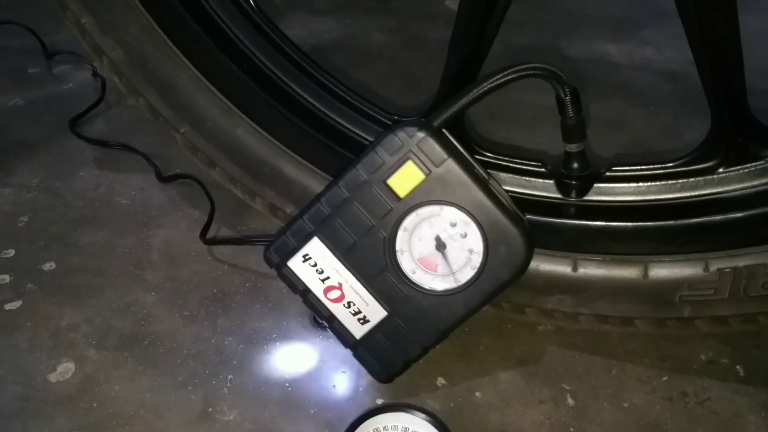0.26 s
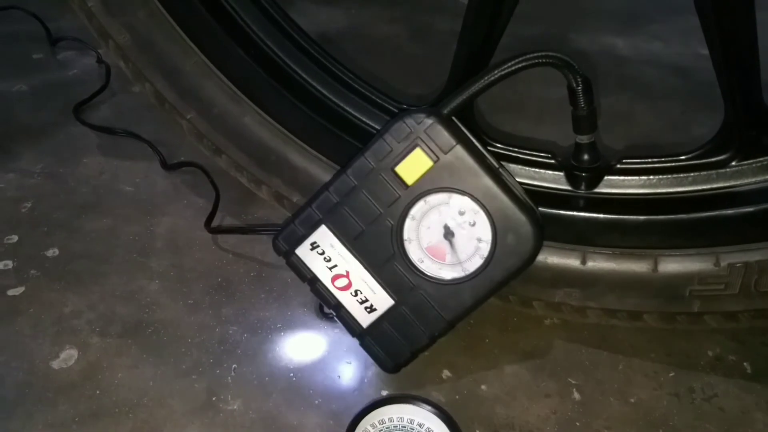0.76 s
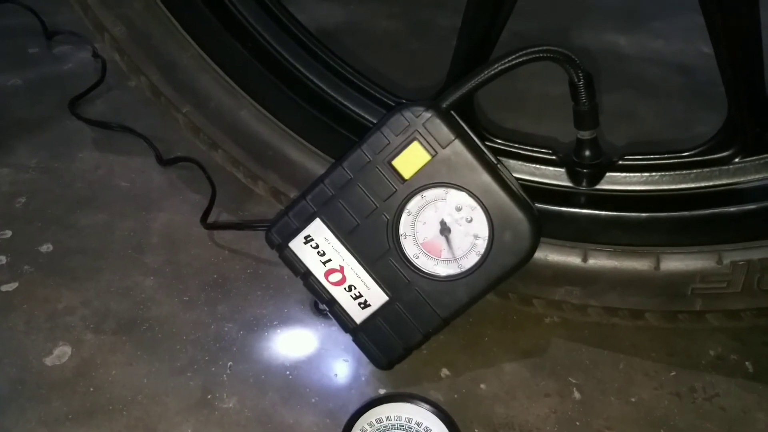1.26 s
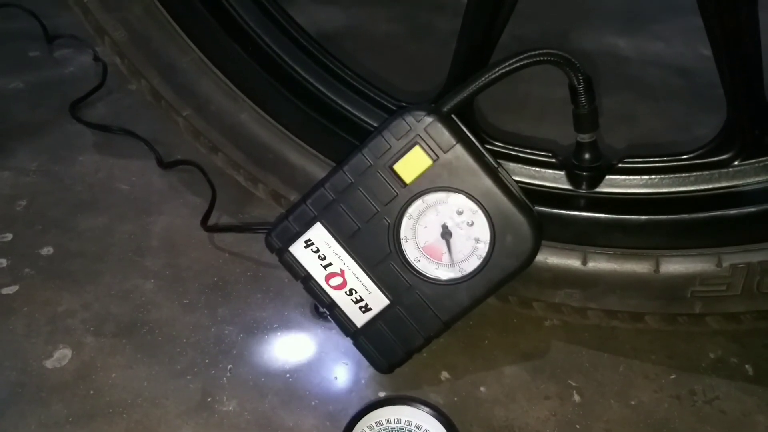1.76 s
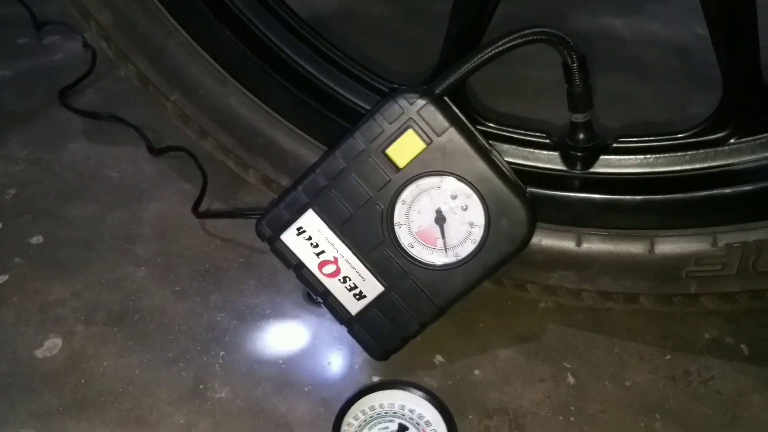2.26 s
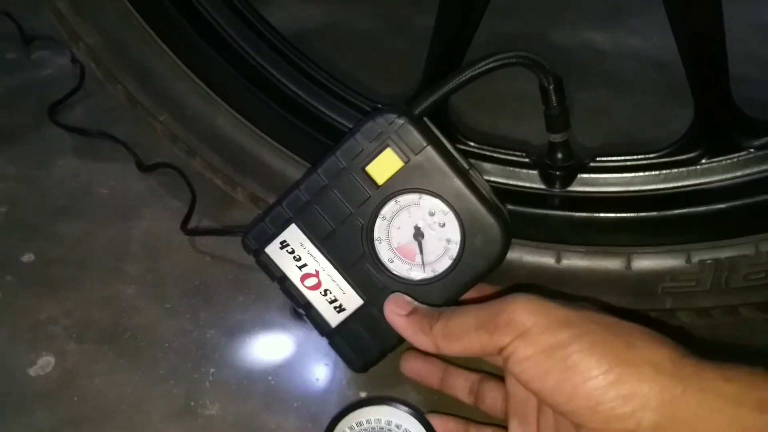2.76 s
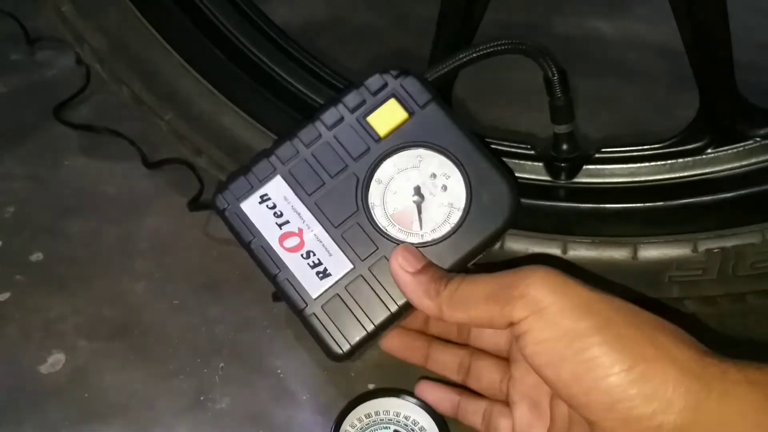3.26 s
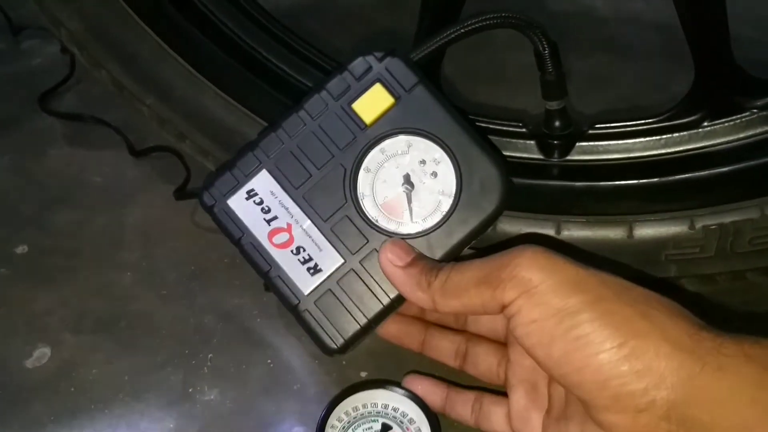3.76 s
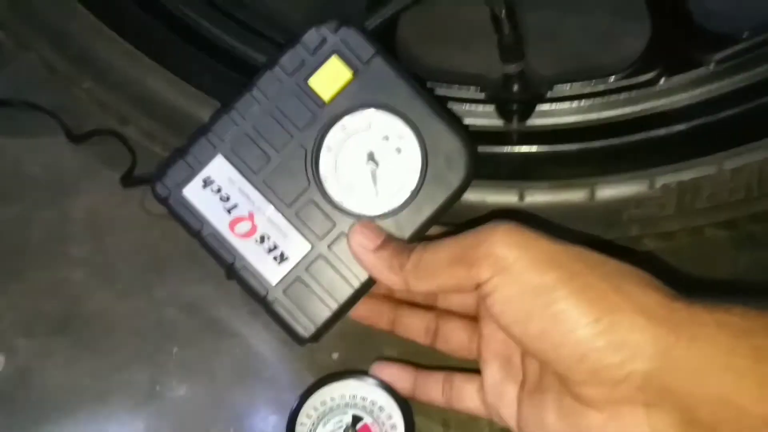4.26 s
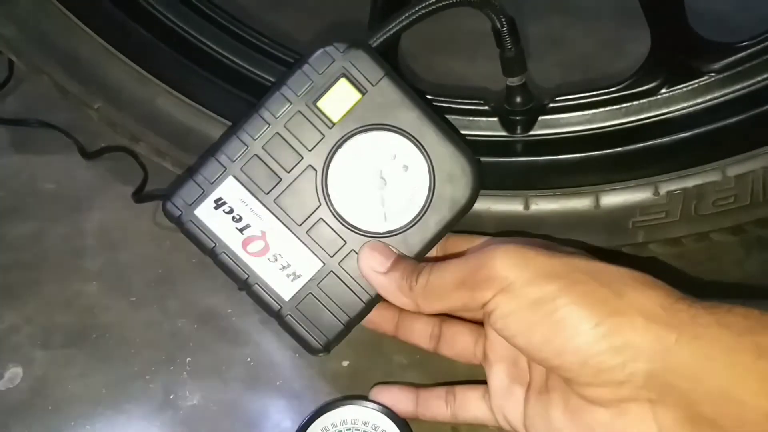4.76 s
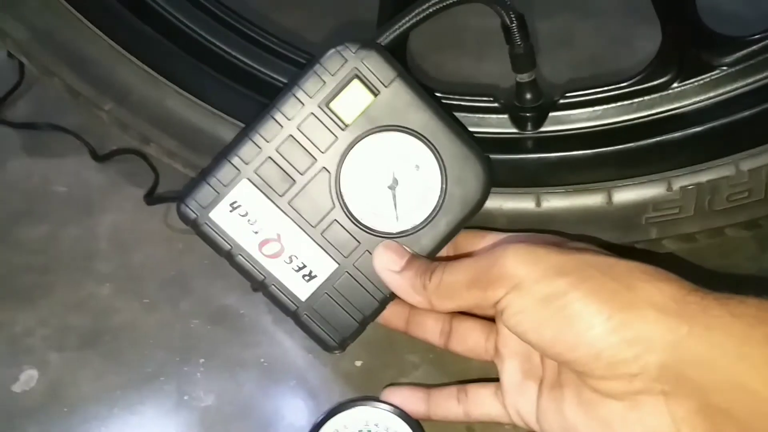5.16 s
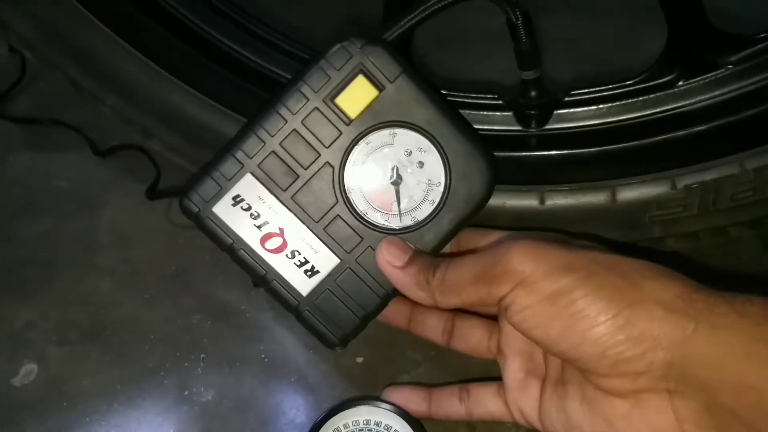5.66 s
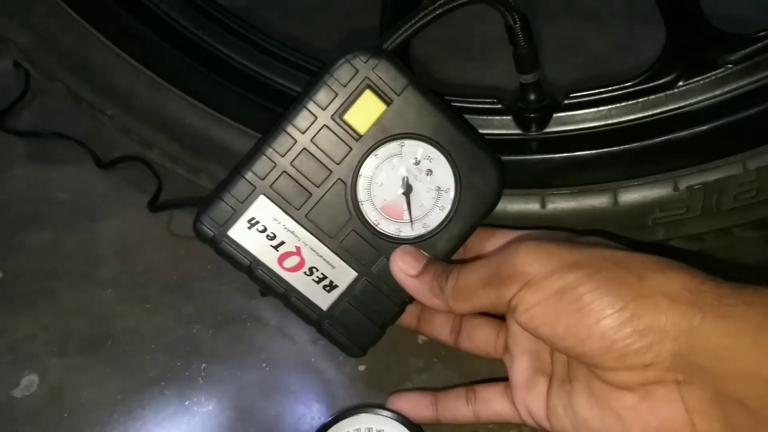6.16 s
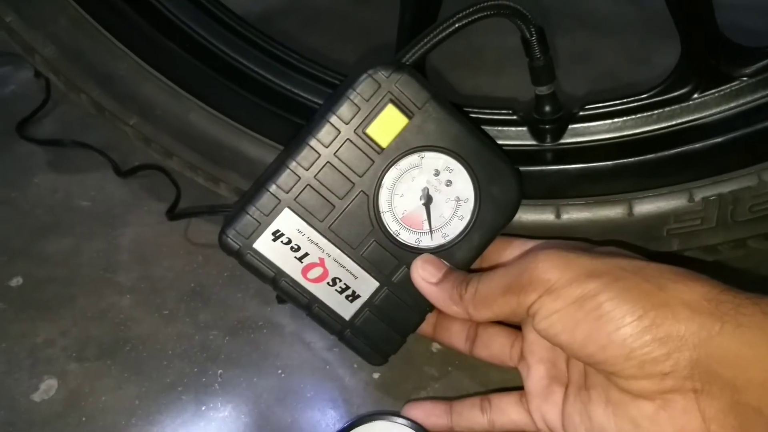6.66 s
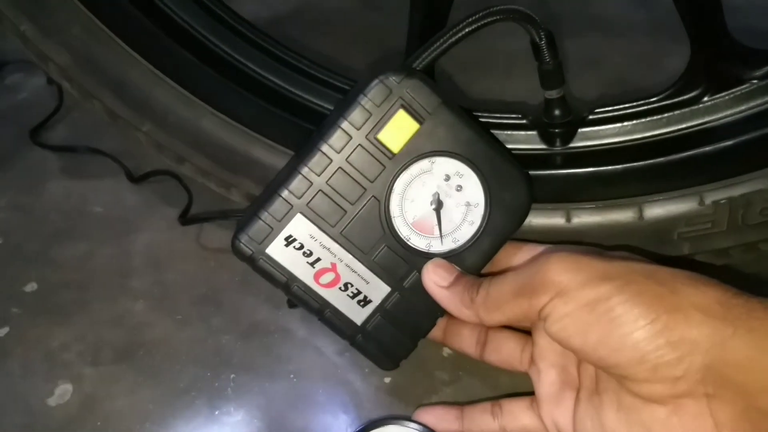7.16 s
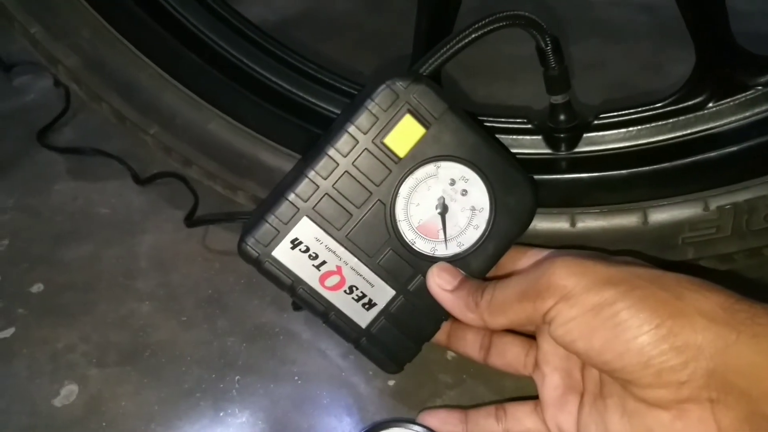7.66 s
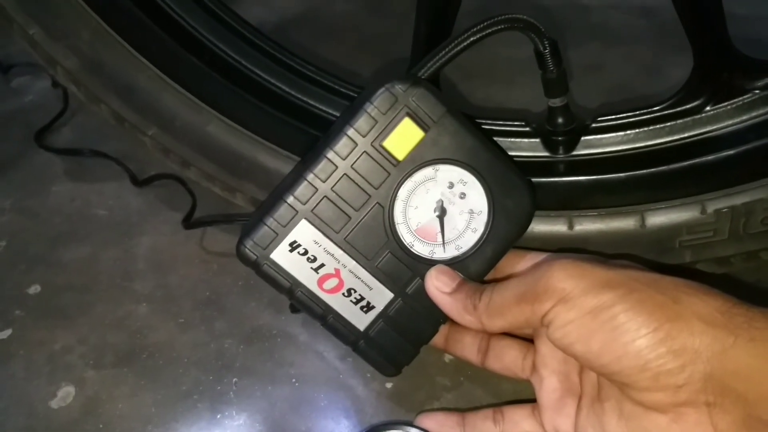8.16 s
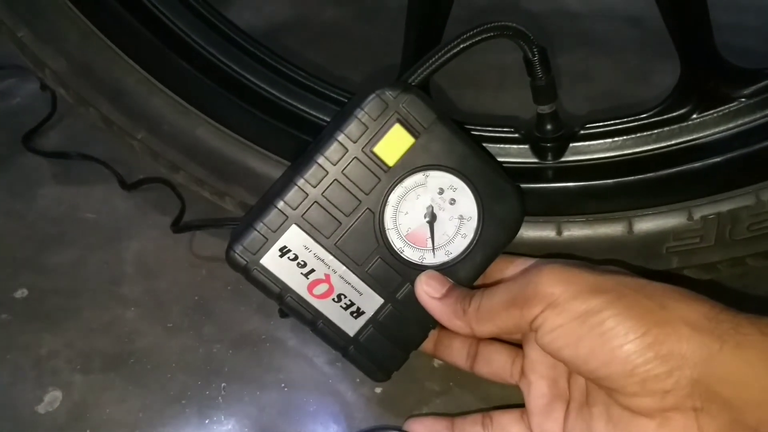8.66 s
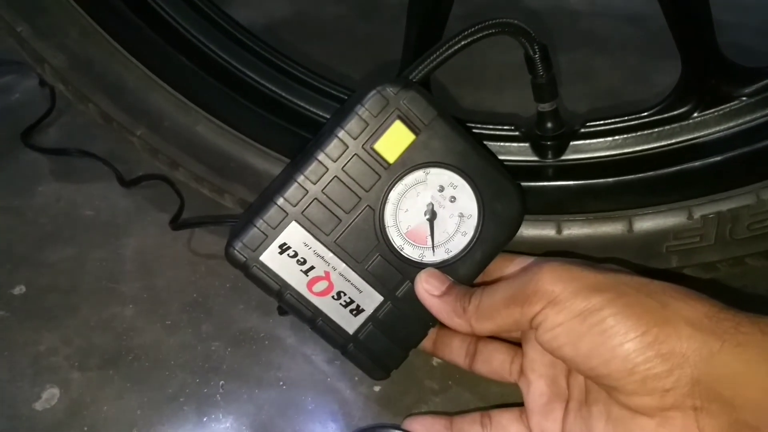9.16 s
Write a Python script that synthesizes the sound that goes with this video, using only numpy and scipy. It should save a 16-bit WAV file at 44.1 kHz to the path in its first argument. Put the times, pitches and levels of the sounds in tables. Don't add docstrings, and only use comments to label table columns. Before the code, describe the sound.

Continuous loud droning chatter from a portable tyre inflator, about sixty knocks a second fused into a coarse buzz. It starts already running and sags very slightly in pitch. A hand touches and picks it up near three seconds with small scuffs and a brief bright ringing, then tilts and steadies it, recolouring the rattle. Close microphone, dry, nearly mono; the motor never stops.

```python
import sys
import numpy as np
from scipy import signal
from scipy.fft import rfft, irfft
from scipy.io import wavfile

SR = 44100
rng = np.random.default_rng(int(sys.argv[2]) if len(sys.argv) > 2 else 0)


def rack_gain(trim_db):
    fader = np.asarray(trim_db, float)
    return 10 ** (fader / 20)


def master(y):
    cut = np.clip(np.atleast_2d(y).T, -1, 1)
    pcm = np.round(cut * 32767)
    wavfile.write(sys.argv[1], SR, pcm.astype(np.int16))


N = 414981

# angle after the knock/turns, repeating contacts level/dB, rattle level/dB
STROKE = [(0, 18, -6.5), (.05, -5, 0), (.14, 10, 3.5), (.25, 2, 0), (.38, -5, -2.5), (.55, -7, -1.5),
          (.72, -6, 1), (.88, -10, 3.5), (.97, -23, -4.5), (1, 2, -2)]
PATTERN_STEPS = 736
FFT_SIZE = 8192


def rms_one(x):
    return x / np.sqrt(np.mean(x ** 2) + 1e-20)


def on_log(points, hz):
    at, db = np.transpose(points)
    return np.interp(np.log(hz), np.log(at), db)


def causal(x, gain):
    half = FFT_SIZE // 2
    cepstrum = irfft(np.log(gain + 1e-9))
    cepstrum[1:half] *= 2
    cepstrum[half + 1:] = 0
    response = irfft(np.exp(rfft(cepstrum)))[:half]
    return signal.fftconvolve(x, response)[:N]


def band(x, hz, width):
    r = np.exp(-np.pi * width / SR)
    poles = [1, -2 * r * np.cos(2 * np.pi * hz / SR), r * r]
    return signal.lfilter([(1 - r * r) / 2, 0, (r * r - 1) / 2], poles, x)


def drift(rate):
    steps = rng.standard_normal(int(N / SR * 200) + 2)
    return np.interp(np.arange(N) / SR * np.clip(rate, .1, 199), np.arange(len(steps)), steps)


def crank():
    # t/s, speed/(turns per minute)
    speed = [(0.0, 3669.8), (1.046, 3647.8), (2.091, 3626.4), (3.137, 3621.7), (4.182, 3606.3),
             (5.228, 3597.4), (6.273, 3584.8), (7.319, 3588.4), (8.364, 3579.1), (9.41, 3595.2)]
    start_turns, wobble_turns, wobbles_per_s = .07, 0.0055, 6
    s, rpm = np.transpose(speed)
    mean = np.cumsum(np.interp(np.arange(N) / SR, s, rpm)) / (60 * SR)
    return start_turns + mean + wobble_turns * drift(wobbles_per_s)


def postures():
    # start t/s, end t/s
    changes = [
        (2.31, 2.38),
        (2.93, 3.17),
        (4.1, 5.1),
        (5.95, 6.35),
    ]
    passed = [np.interp(np.arange(N) / SR, span, [0, 1]) for span in changes]
    return -np.diff([np.ones(N)] + passed + [np.zeros(N)], axis=0)


def knocks(turns, jitter_s, uneven_db):
    chance = rng.standard_normal((int(turns[-1]) + 1, 2))
    at = np.interp(np.arange(len(chance)), turns, np.arange(N)) + jitter_s * SR * chance[:, 0]
    at = np.clip(at, 0, N - 2)
    whole = at.astype(int)
    size = rack_gain(uneven_db * chance[:, 1])
    clicks = np.zeros(N)
    np.add.at(clicks, whole, size * (1 - at + whole))
    np.add.at(clicks, whole + 1, size * (at - whole))
    return clicks


def lagged(x, hz, width):
    r = np.exp(-np.pi * width / SR)
    poles = [1, -2 * r * np.cos(2 * np.pi * hz / SR), r * r]
    return signal.lfilter(poles[::-1], poles, x)


def knock_gain(modes, hz, turn_hz):
    # order/(multiple of crank rate), level/dB
    thud_orders = [(1, -41), (2, -22), (3, -44), (4, -19.5), (5, -28.5), (6, -22.5), (7, -15.5), (8, -16.5)]
    power = rack_gain(2 * -32.5)
    for centre_hz, width, db in modes:
        power = power + rack_gain(2 * db) / (1 + (2 * (hz - centre_hz) / max(width, 30)) ** 2) ** 2
    frame = np.sqrt(power / (1 + (hz / 3800) ** 40))
    order, db = np.transpose(thud_orders)
    thud = rack_gain(np.interp(hz / turn_hz, np.r_[0, order], np.r_[-60, db]))
    return np.where(hz < (order[-1] + .5) * turn_hz, thud, frame)


def contacts(turns, slip_turns):
    pattern = rng.standard_normal(PATTERN_STEPS) * rack_gain(2.0 * rng.exponential(1, PATTERN_STEPS))
    angle = (turns + slip_turns * drift(60)) % 1
    at, db, _ = np.transpose(STROKE)
    rough = np.interp(angle * PATTERN_STEPS, np.arange(PATTERN_STEPS), pattern, period=PATTERN_STEPS)
    return rms_one(rough * rack_gain(np.interp(angle, at, db)))


def rattle(turns, uneven_db, grain_db):
    at, _, db = np.transpose(STROKE)
    gate_db = np.interp(turns % 1, at, db) + uneven_db * drift(45) + 1.0 * drift(180)
    return rms_one(rng.standard_normal(N) * rack_gain(gate_db + grain_db * rng.exponential(1, N)))


def valve(turns):
    centre_turn, length_turns, reed_hz, reed_width_hz = 0.74, 0.17, 5110, 500
    gate = np.exp(-((turns % 1 - centre_turn) / length_turns) ** 2) * rack_gain(0.77 * drift(72))
    angle = (turns + 0.00065 * drift(60)) % 1
    pattern = rng.standard_normal(PATTERN_STEPS)
    flutter = np.interp(angle * PATTERN_STEPS, np.arange(PATTERN_STEPS), pattern)
    hiss = band((flutter + .4 * rng.standard_normal(N)) * gate, reed_hz, reed_width_hz)
    return rms_one(band(hiss, reed_hz, reed_width_hz))


def housing_gain(posture, hz):
    # f/Hz, width/Hz, level/dB
    standing = [
        [(5000, 53, -1), (5400, 61, -9), (6170, 88, -11), (7600, 140, -14), (10100, 60, -26), (11740, 110, -18),
         (12430, 230, -15), (13400, 100, -29)],
        [(5000, 95, -1), (5400, 41, -15), (6630, 320, -27), (7600, 54, -14), (8000, 140, -20), (8400, 110, -15),
         (12100, 600, -21), (14400, 330, -24)],
    ]
    # f/Hz, width/Hz, level/dB
    raised = [
        [(4480, 40, -11), (5220, 780, -5.5), (6100, 38, -28), (6660, 130, -7), (7370, 38, -6.5),
         (7720, 50, -13), (8200, 70, -9.5), (10700, 120, -24), (12060, 100, -8.5)],
        [(3680, 130, -5), (4880, 90, -3.5), (5260, 77, -5.5), (5500, 81, -9), (5800, 140, -5.5),
         (6620, 140, -13), (7300, 100, -11), (7890, 91, -6.5), (9440, 220, -13.5), (12100, 100, -14)],
        [(3990, 100, -11), (4940, 96, -12.5), (5360, 83, -5.5), (5340, 72, -11), (5830, 84, -8.5),
         (6740, 94, -22), (7670, 62, -13), (7970, 78, -12), (10000, 79, -21), (11940, 340, -19.5)],
    ]
    # f/Hz, level/(dB per Hz)
    broad = [
        [(30, -42), (350, -23), (750, -8), (1100, -11), (1700, -4), (2300, -9), (3200, -6)],
        [(30, -42), (350, -23), (750, -8), (1300, -13), (1700, -8), (2400, -11), (3200, -9)],
        [(30, -38), (350, -21), (750, -6), (1300, -13), (1800, -8), (2500, -8), (3200, -1)],
        [(30, -40), (350, -23), (780, -7), (1450, -14), (1800, -9), (2200, -11), (3200, -6)],
        [(30, -40), (350, -23), (780, -7), (1450, -14), (1800, -9), (2200, -12), (3200, -9)],
    ]
    # f/Hz, level/(dB per Hz)
    upper = [
        [(4400, -11.5), (6000, -13), (7000, -16), (8300, -17.5), (10400, -33.5), (13300, -29), (15300, -28)],
        [(4400, -12.5), (6000, -14), (7000, -18.5), (8300, -20.5), (10400, -28), (13300, -26), (15300, -27)],
        [(4400, -14), (5600, -10.5), (6900, -23.5), (9000, -16.5), (10400, -27), (13300, -24), (15300, -24)],
        [(4400, -14.5), (5600, -12.5), (6900, -16.5), (9300, -21), (10600, -26), (13300, -26), (15300, -25.5)],
        [(4400, -14.5), (5600, -7), (6900, -18.5), (8500, -19), (10600, -28), (13300, -27.5), (15300, -27)],
    ]
    power = rack_gain(2 * on_log(broad[posture] + upper[posture], hz))
    for centre_hz, width, db in (standing + raised)[posture]:
        damped_hz = 1.4 * max(width, 130)
        power = power + rack_gain(2 * db) / (1 + (2 * (hz - centre_hz) / damped_hz) ** 2) ** 2
    return np.sqrt(power)


def pump():
    # f/Hz, width/Hz
    lags = [(330, 336), (1700, 690), (3150, 420)]
    # knock, its crack, repeating contacts, rattle, valve hiss, each level/dB
    mix = [
        (4.5, -17, -8.5, 1, -21),
        (4.5, -14, -9.5, -2, -20),
        (4.5, -16.5, -12, -1, -20.5),
        (5, -12.5, -10, -2.5, -14.5),
        (5, -11, -9, -3.5, -15),
    ]
    # knock level/dB, rattle level/dB
    loudness = [
        (-46.5, -45),
        (-48.5, -45),
        (-46.5, -43.5),
        (-48.5, -44),
        (-47.5, -43),
    ]
    early_s = [0, .0004, .0005, .0006, .0007]
    # t/s, level/dB
    near = [(0, -0.5), (.03, -0.5), (2.2, 0), (2.4, -1), (2.9, -0.5), (3.05, -0.5), (3.35, 0), (4, -0.36),
            (4.75, 0.65), (5.9, 0.15), (9.41, 0)]
    # f/Hz, width/Hz, level/dB
    on_floor = [(650, 50, 1), (668, 560, -7), (797, 68, -0.6), (1088, 137, -5.5), (1260, 84, -6.5),
                (1408, 84, -0.6), (1701.0, 353, -2.2), (2530, 35, -7), (2650, 39, -42), (2794, 39, -7.5),
                (3040, 45.0, -8), (3420, 300, -15), (3490, 45.0, -7)]
    # f/Hz, width/Hz, level/dB
    gripped = [(584.0, 140, -6), (655, 67, 2), (805, 57, 4), (1060, 240, -8), (1280, 45.0, -6),
               (1380, 45.0, -5.5), (1490, 53.0, -18), (1720, 160, -3.5), (1900, 99, -5.5),
               (2231.0, 184.0, -15), (2510.0, 65, -6.5), (2780.0, 46, -10.5), (3330, 134, -7.5)]
    # f/Hz, width/Hz, level/dB
    lifted = [(571.7, 63, -2.6), (653.7, 61, 3.3), (805, 58, 6), (1030, 128, -6), (1280, 29, -3.5),
              (1560, 38, -6), (1930, 240, -5.5), (2470, 230, -11), (2615, 43, -6), (3210, 24, -1),
              (3150, 330, -3), (3489.0, 46.0, -22), (3600, 82, -6)]
    # f/Hz, width/Hz, level/dB
    tilted = [(636, 230, -3), (655, 76, -1), (806, 71, 6), (1024, 41, -1), (1285, 200, -10),
              (1707, 49, -0.5), (1885, 150, -6), (2040, 45.0, -9), (2354, 69, -6.5), (2450, 48, -6.5),
              (2660, 110, -7), (3170, 130, -4.5), (3840, 340, -29)]
    # f/Hz, width/Hz, level/dB
    held = [(649, 166.0, 1.7), (808, 70, 6.5), (1014.4, 53, 0), (1223, 290, -9.5), (1640, 40, 4),
            (1758, 110, -3), (1904, 136, -5.5), (2310, 77, -4), (2513.0, 110, -8.5), (2656, 51, 0.5),
            (2920, 220, -10.5), (3263, 55, -2), (3570, 50, -8)]
    turns = crank()
    clicks = -knocks(turns, jitter_s=1.2e-5, uneven_db=-0.32)
    for lag_hz, width in lags:
        clicks = lagged(clicks + 1e-18, lag_hz, width)
    cracks = knocks(turns - .015, jitter_s=1.2e-5, uneven_db=1.0)
    repeating = contacts(turns, slip_turns=0.0006)
    loose = rattle(turns, uneven_db=0.1, grain_db=0.9)
    hiss = valve(turns)
    hz = np.maximum(np.arange(FFT_SIZE // 2 + 1) * SR / FFT_SIZE, 1)
    above_knock = 1 / np.sqrt(1 + (3700 / hz) ** 16)
    slack = rack_gain(-4.5 / (1 + (hz / 6500) ** 8))
    out = ping(turns)
    for posture, share in enumerate(postures()):
        turn_hz = np.sum(np.gradient(turns) * share) / np.sum(share) * SR
        frame = knock_gain((on_floor, gripped, lifted, tilted, held)[posture], hz, turn_hz)
        body = housing_gain(posture, hz)
        low_db, crack_db, repeat_db, loose_db, hiss_db = mix[posture]
        knock = np.roll(causal(clicks, frame), -round(early_s[posture] * SR))
        low = rack_gain(low_db) * rms_one(knock)
        high = rack_gain(crack_db) * rms_one(causal(cracks, body * above_knock / (1 + (hz / 7000) ** 8)))
        high = high + rack_gain(repeat_db) * rms_one(causal(repeating, body * above_knock))
        high = high + rack_gain(loose_db) * rms_one(causal(loose, body * slack))
        high = high + rack_gain(hiss_db) * hiss
        knock_db, rattle_db = loudness[posture]
        out += share * rack_gain(knock_db) * low
        out += np.sqrt(share) * rack_gain(rattle_db) * high / np.sqrt(1 + 4 * share * (1 - share))
    return out * rack_gain(2 * np.interp(np.arange(N) / SR, *np.transpose(near)))


def rumble():
    lows = signal.butter(2, [45, 130], "band", fs=SR, output="sos")
    return rack_gain(-87.5) * rms_one(signal.sosfilt(lows, rng.standard_normal(N)))


def scuffs():
    # t/s, peak level/dB
    brushes = [
        (2.285, -46),
        (2.303, -43),
        (2.34, -47),
        (2.385, -39),
        (2.8823, -49),
        (2.9158, -47),
        (2.9766, -55),
    ]
    clicks = np.zeros(N)
    for s, db in brushes:
        clicks[round(s * SR)] = rack_gain(db - 5)
    fade = np.exp(-1 / (.014 * SR))
    envelope = signal.lfilter([1], [1, -fade], clicks)
    return band(rng.standard_normal(N) * envelope, 9000, 9900)


def ping(turns):
    start_s, end_s, ring_hz, width_hz = 2.92, 3.13, 8100, 230
    free = np.interp(np.arange(N) / SR, [start_s, start_s + .02, end_s - .03, end_s], [0, 1, 1, 0])
    taps = knocks(turns - .8, jitter_s=1e-4, uneven_db=1.0)
    ring = band(band(taps + 1e-18, ring_hz, width_hz), ring_hz, 3 * width_hz)
    return rack_gain(-55.5) * free * rms_one(ring)


def scene():
    # f/Hz, width/Hz, alike level/dB, unlike level/dB
    side_bands = [(1900, 600, -12.5, -40), (9900, 1000, -21, -11.5)]
    mid = pump() + scuffs() + rumble()
    side = 0
    later = np.roll(mid, 311)
    for (hz, width, alike_db, unlike_db), sign in zip(side_bands, (1, -1)):
        differ = band(sign * rack_gain(alike_db) * mid + rack_gain(unlike_db) * later, hz, width)
        side = side + band(differ, hz, 1.77 * width)
    return np.array([mid + side, mid - side])


def top_cut(x):
    return signal.sosfilt(signal.butter(12, 16080, fs=SR, output="sos"), x)


def record(dry):
    low_pass = signal.ellip(12, .5, 80, 15450, fs=SR, output="sos")
    return top_cut(signal.sosfilt(low_pass, dry))


dry = scene()
out = record(dry)
master(out)
```